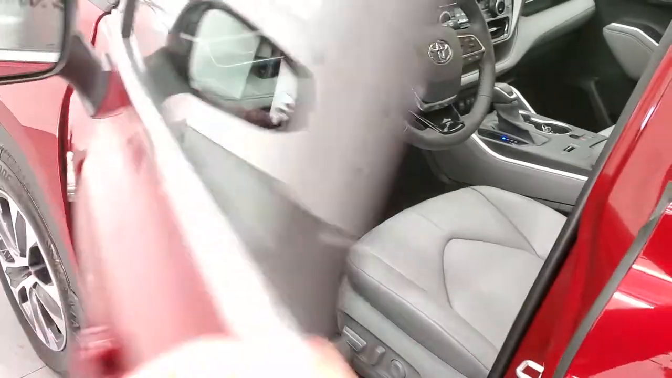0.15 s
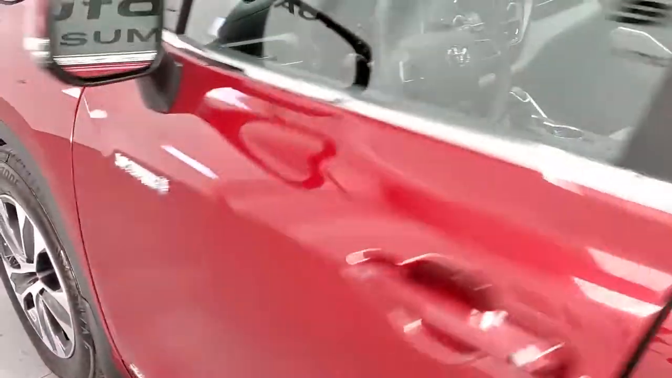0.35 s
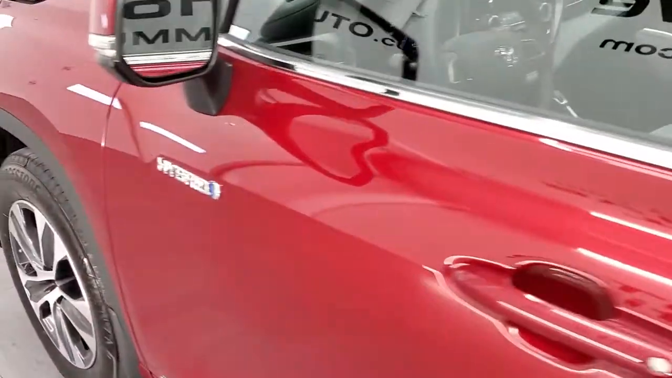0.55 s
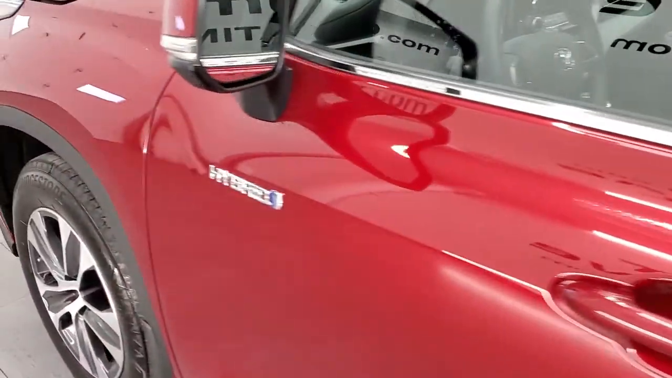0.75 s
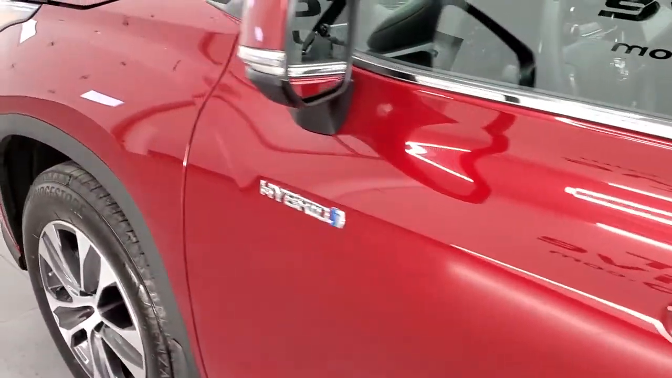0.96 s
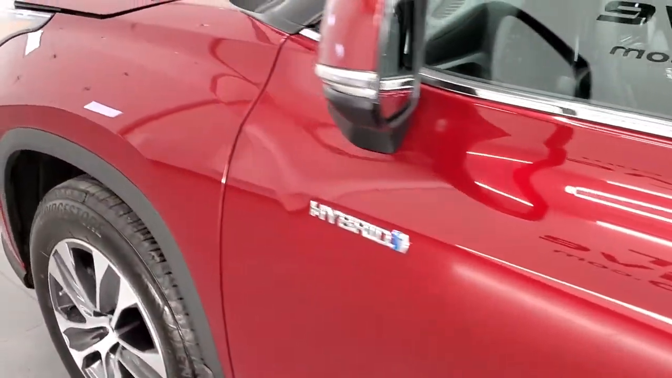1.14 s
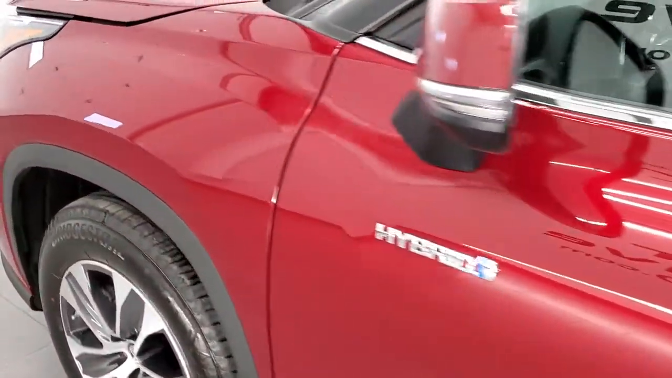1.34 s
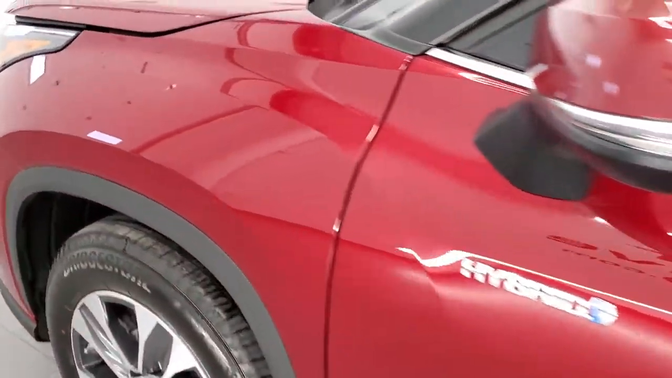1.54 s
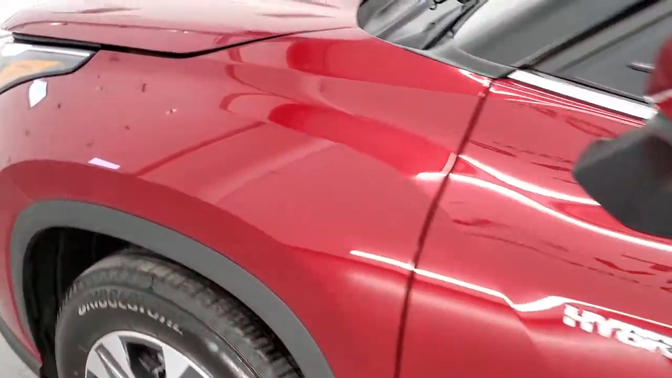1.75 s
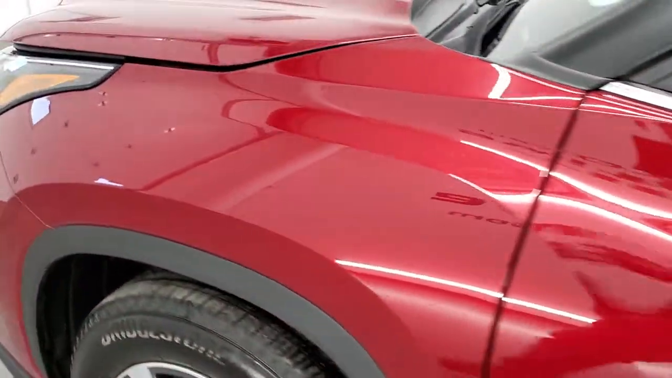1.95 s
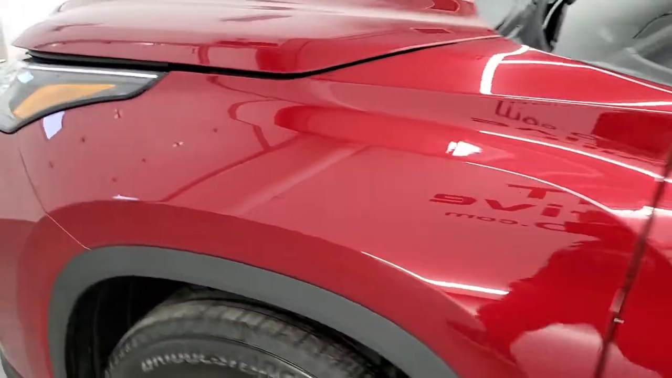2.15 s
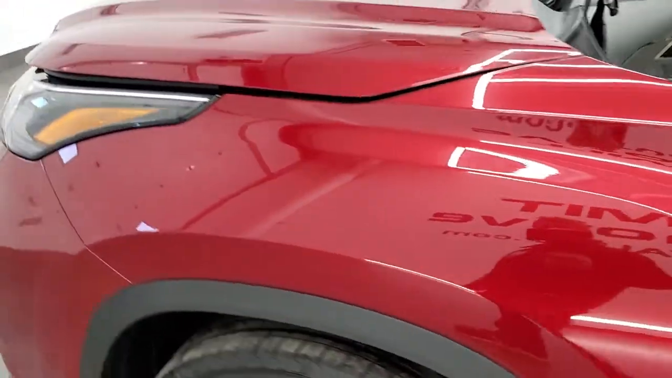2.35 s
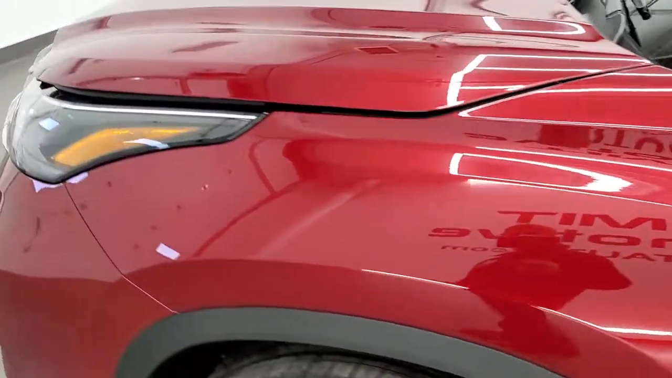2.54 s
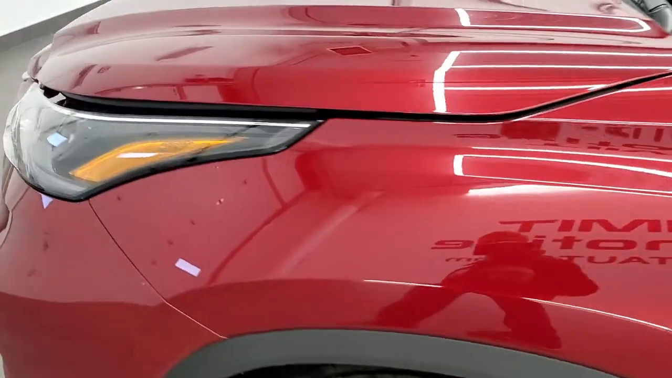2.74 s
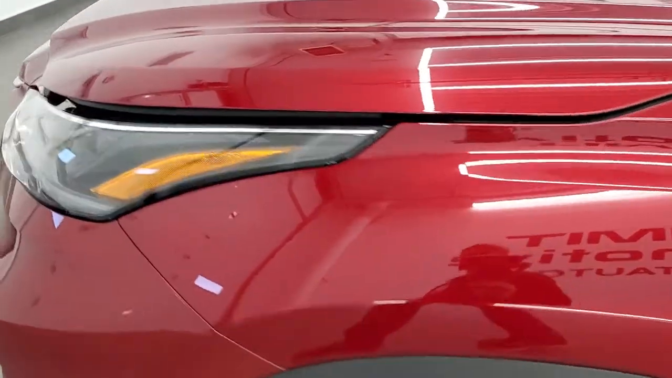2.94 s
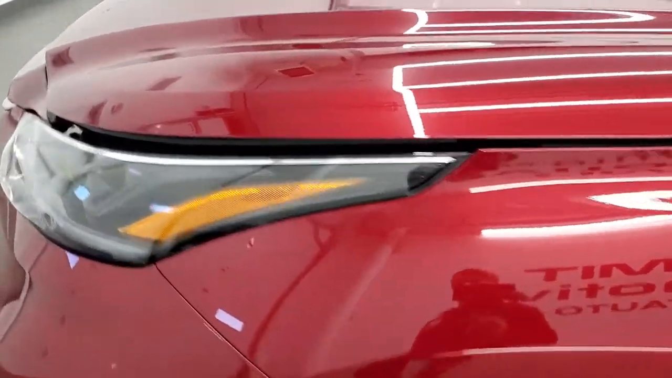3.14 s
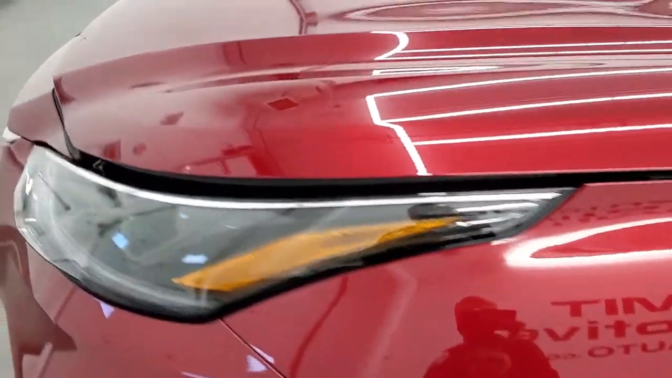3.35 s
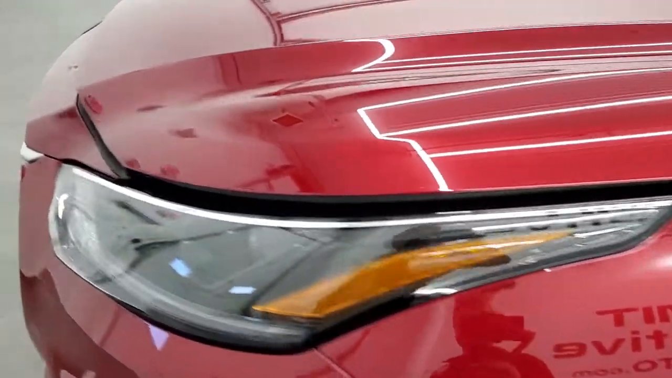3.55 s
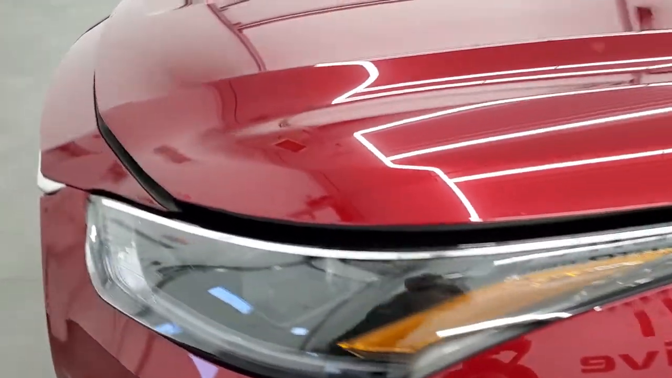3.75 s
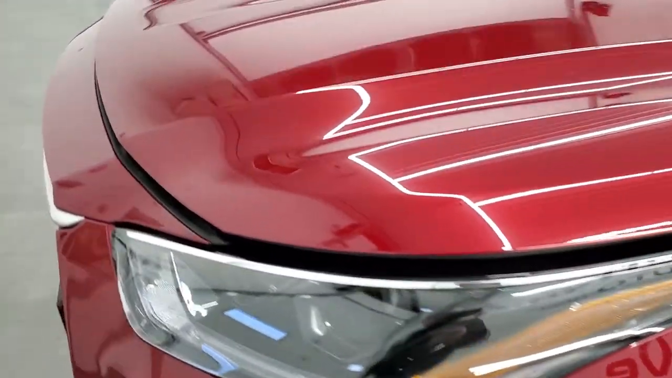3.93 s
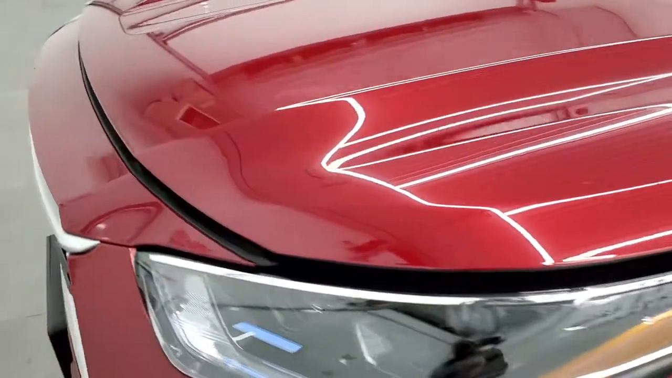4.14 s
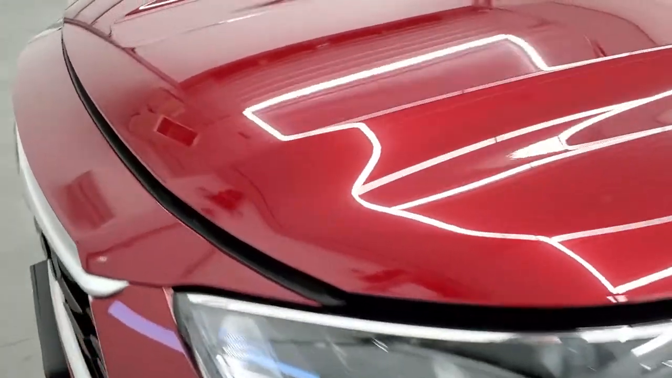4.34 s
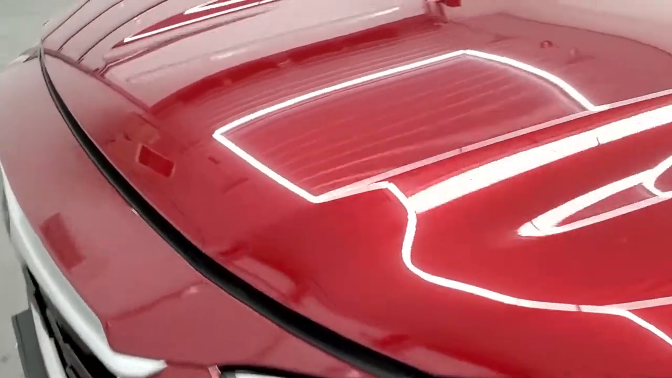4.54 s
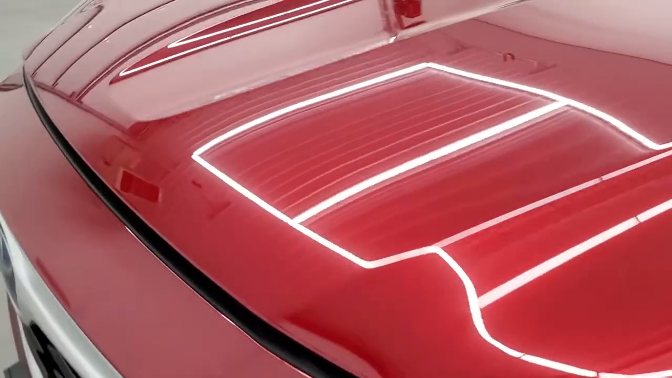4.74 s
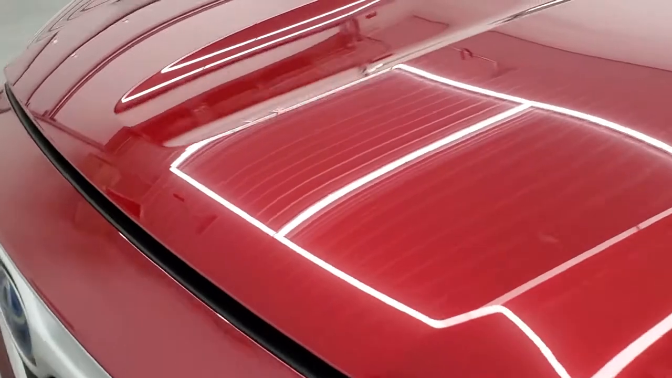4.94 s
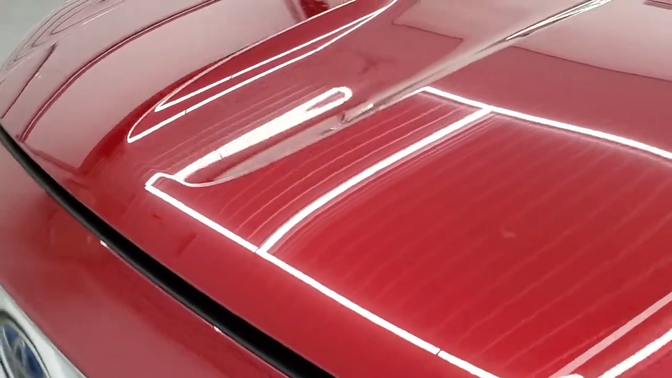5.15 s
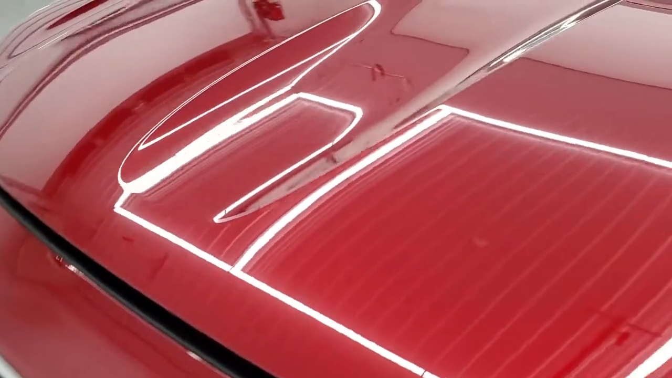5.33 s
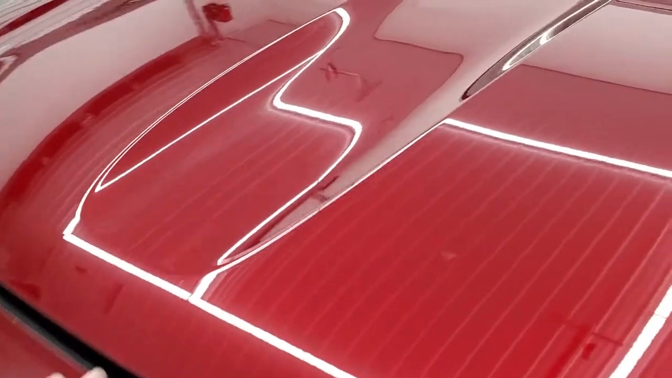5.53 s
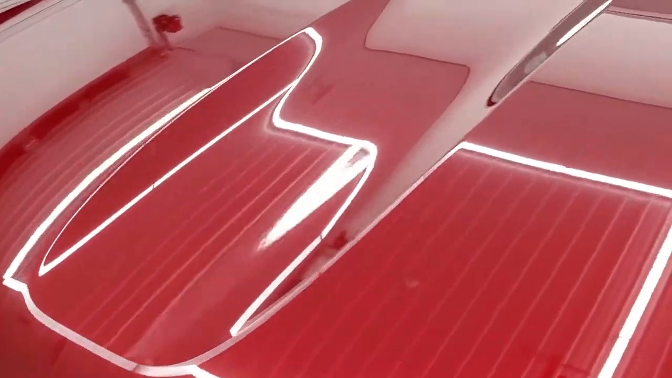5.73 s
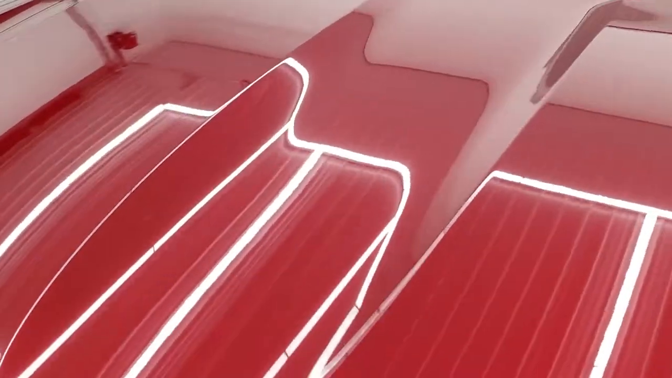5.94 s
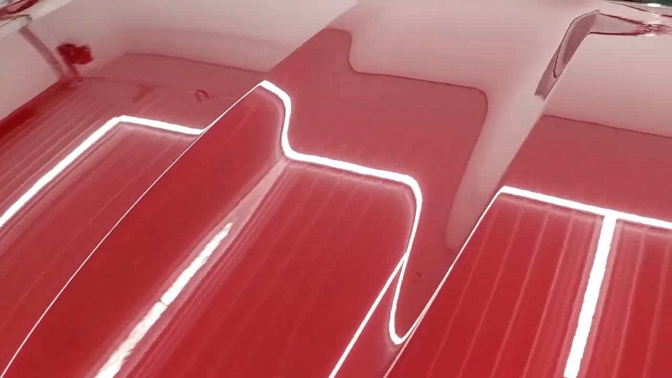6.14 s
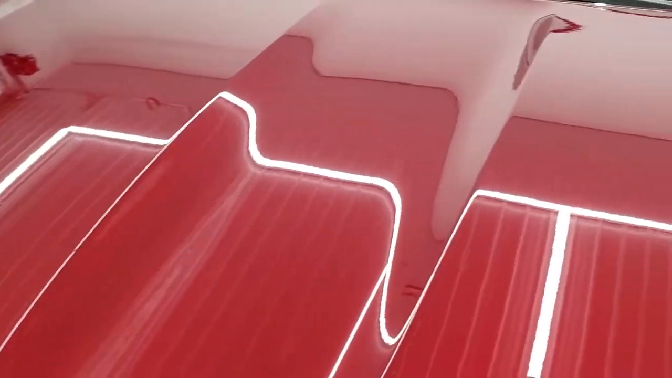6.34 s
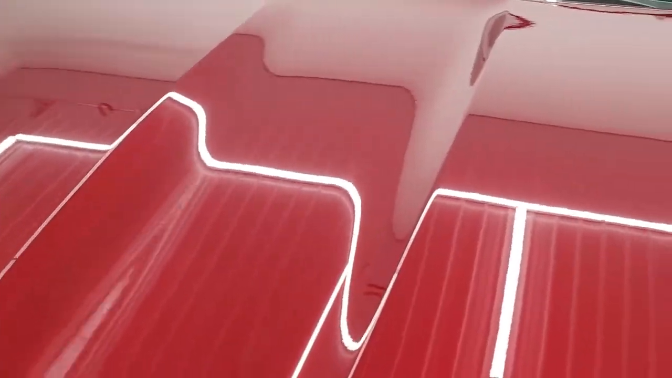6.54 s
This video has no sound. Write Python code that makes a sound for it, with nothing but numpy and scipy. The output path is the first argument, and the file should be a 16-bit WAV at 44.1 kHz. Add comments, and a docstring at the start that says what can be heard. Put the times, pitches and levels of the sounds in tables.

```python
"""Ventilation hums throughout in a large, echoing hall. A palm shoves a car door, which throbs as it
swings and squeezes air past its seal. The seal lands, the latch snaps home, and body and hall boom.
Someone then walks slowly round the car: heels strike, rubber soles drag, creak and chirp by friction,
and clothes rustle with each stride. Last, fingers bump the camera and set its case ringing."""
import sys
import numpy as np
from scipy import signal
from scipy.fft import rfft, irfft, next_fast_len
from scipy.io import wavfile
from scipy.ndimage import map_coordinates

SR = 44100
rng = np.random.default_rng(int(sys.argv[2]) if len(sys.argv) > 2 else 0)


def master_out(mix):
    """Clip the mix to full scale and print it as 16-bit PCM to the path in sys.argv[1]."""
    frames = np.transpose(np.atleast_2d(mix))
    ceiling = np.clip(frames, -1, 1)
    pcm = np.round(ceiling * 32767).astype(np.int16)
    wavfile.write(sys.argv[1], SR, pcm)


N = 290442


def amp(db):
    """Decibels to amplitude ratio."""
    return 10 ** (np.asarray(db) / 20)


def unit(x):
    """Normalise to rms 1."""
    return x / np.sqrt(np.mean(x ** 2) + 1e-20)


def along(points, hz):
    """Interpolate (frequency, value) points on a logarithmic frequency axis."""
    freqs, values = np.transpose(points)
    return np.interp(np.log(hz + 1), np.log(freqs + 1), values)


def clock():
    """The time of every sample in seconds."""
    return np.arange(N) / SR


def curves(rows):
    """Interpolate each column after the time to one value per sample."""
    times, *columns = np.transpose(rows)
    return [np.interp(clock(), times, column) for column in columns]


def wobble(rate):
    """Smooth random modulation with rate knots a second."""
    return map_coordinates(rng.standard_normal(int(N * rate / SR) + 4), [clock() * rate])


def swell(t, rise, fall):
    """A rounded envelope that peaks at t = 0."""
    return np.exp(-(abs(t) / np.where(t < 0, rise, fall)) ** 1.5)


def filtered(x, response):
    """Linear filtering: multiply the spectrum by a frequency response."""
    n = x.shape[-1]
    padded = next_fast_len(n + 8192)
    return irfft(rfft(x, padded) * response(np.fft.rfftfreq(padded, 1 / SR)), padded)[..., :n]


def add(out, s, sound):
    """Superpose a sound on out from time s."""
    part = out[:, max(round(s * SR), 0):][:, :sound.shape[-1]]
    part += sound[..., :part.shape[-1]]


# Likeness of left and right in a diffuse field: (frequency [Hz], correlation [-1 to 1])
CORRELATION = [(60, 0.96), (130, 0.86), (290, 0.9), (640, 0.44), (1400, -0.12), (3000, -0.0099),
               (7000, -0.042)]
def noise(spectrum, size, tilt_db=0):
    """Diffuse field of rms 1, correlated only at long wavelengths; tilt is per octave above 500 Hz."""
    def response(hz):
        colour = amp(along(spectrum, hz) + tilt_db * np.log2(np.maximum(hz, 500)))
        angle = np.arccos(np.clip(along(CORRELATION, hz), -1, 1)) / 2
        return colour * [np.cos(angle), np.sin(angle)]
    mid, side = filtered(rng.standard_normal((2, size)), response)
    return unit(np.array([mid + side, mid - side]))


def burst(spectrum, t60, attack=0.0008):
    """A noise transient with a quick onset and exponential decay."""
    t = clock()[:SR // 2]
    return noise(spectrum, size=len(t)) * amp(-60 * t / t60) * (1 - np.exp(-t / attack))


def ring(modes, contact=0.0014):
    """Free vibration after a blow: a sum of damped modes, neighbours in antiphase."""
    t = clock()[:2 * SR]
    vibration = sum((-1) ** k * amp(db - 60 * t / t60) * np.sin(2 * np.pi * hz * t)
                    for k, (hz, db, t60) in enumerate(modes))
    return vibration * (1 - np.exp(-t / contact))


# Ventilation along the walk: (time [s], hum level [dB], air level [dB])
VENT_LEVELS = [(0, -42.5, -46.5), (1.5, -53, -64), (2.5, -53.5, -62), (3.2, -49.5, -58.5),
               (4.1, -49.5, -57), (4.7, -44.5, -55), (5.6, -46, -55.5), (6.59, -44, -50.5)]
# Tones of the fan and of its motor: (frequency [Hz], relative level [dB])
FAN_TONES = [(84.5, -4), (125, -7.5), (169, -23)]
MOTOR_TONES = [(2487, -73), (6842, -84)]
# Spectra of the ducts and of rushing air: (frequency [Hz], relative level [dB])
DUCT_SPECTRUM = [(20, -7), (30, -9), (46, 6), (60, 2.5), (75, 0), (105, -1), (140, -6.5), (200, -14),
                 (300, -32.5), (600, -68.5)]
AIR_SPECTRUM = [(100, 0.5), (200, 3), (380, 1), (700, -5.5), (1050, -4), (2100, -10.5), (2600, -18),
                (4100, -22), (5300, -23), (7100, -36), (9000, -41), (12000, -78)]
def ventilation(rumble_db=-1.0, shade_db=-9, clear_s=3.9):
    """Tonal fan noise over broadband flow noise; hum and whine grow toward the front of the car."""
    t = clock()
    hum_db, air_db = curves(VENT_LEVELS)
    hum = sum(amp(db + 2.5 * wobble(2.82)) * unit(np.sin(2 * np.pi * hz * t + wobble(4.3)))
              for hz, db in FAN_TONES)
    whine = sum(amp(db + 3 * wobble(5.42)) * unit(np.sin(2 * np.pi * hz * t + .7 * wobble(35)))
                for hz, db in MOTOR_TONES)
    whine *= amp(np.interp(t, [0, clear_s], [shade_db, 0]))
    rumble = amp(rumble_db) * noise(DUCT_SPECTRUM, size=N)
    return amp(hum_db) * (hum + rumble) + amp(air_db) * noise(AIR_SPECTRUM, size=N) + whine


# Fine high hiss drops away after the slam, then slowly grows: (time [s], level [dB])
HISS_LEVELS = [(0, -68), (.5, -69), (.95, -85.5), (2, -76.5), (4.7, -70.5), (6.4, -64), (6.59, -67.5)]
# Fine high hiss, with the microphone's dip at 10 kHz: (frequency [Hz], relative level [dB])
HISS_SPECTRUM = [(2500, -2), (5000, 7), (7800, 11.5), (9000, -4), (10200, 0), (12000, 5), (15500, 1.5)]
def hiss_and_rustle(stride_db=-73.5, stride_lag_s=0.083, arm_db=-65, arm_s=.21, crinkle_db=-7):
    """Amplitude modulation: a fine, crinkling hiss swells as the sleeve moves and trouser legs brush."""
    t = clock()
    strides = sum(swell(t - s - stride_lag_s, rise=0.15, fall=0.21) for s, _, _ in FOOTFALLS)
    arm = swell(t - arm_s, rise=0.1, fall=0.059)
    envelope = amp(curves(HISS_LEVELS)[0]) + amp(stride_db) * strides + amp(arm_db) * arm
    flicker = amp(6 * np.clip(wobble(160), -3, 3))
    crinkles = unit(flicker * noise([(5000, -32), (10000, -7), (12500, 0), (15500, 0)], size=N))
    flutter = amp(wobble(13))
    return envelope * flutter * (noise(HISS_SPECTRUM, size=N) + amp(crinkle_db) * crinkles)


# Throb of the moving door: (time [s], level [dB])
THROB_LEVELS = [(0, -24), (.04, -30.5), (.13, -27.5), (.22, -33.5), (.28, -33.5), (.35, -36), (.39, -58)]
# Modes of the damped door skin: (frequency [Hz], relative level [dB], t60 [s])
SKIN_MODES = [(54, -2.5, 0.14), (150, -7, 0.048), (292, -0.5, 0.046), (404, -2.5, 0.023), (636, -8, 0.025),
              (730, -23, 0.033), (997, -9, .035), (1213, -16, 0.039)]
def door_swing(throb_hz=45, shove_s=.032, shove_db=-17, soft_hz=450, squeeze_db=-30, squeeze_s=0.015):
    """A soft impact excites mainly low modes; the door then throbs and displaces air past its seal."""
    t = clock()
    throb = amp(curves(THROB_LEVELS)[0]) * unit(np.sin(2 * np.pi * throb_hz * t + .5 * wobble(49)))
    seal_s = DOOR_CONTACTS[0][0]
    squeeze = amp(squeeze_db) * np.exp(-abs(t - seal_s) / squeeze_s)
    air = noise([(100, -9), (500, 6.0), (1100, -5), (2200, -13), (5000, -33), (12000, -36)], size=N)
    out = throb + squeeze * air
    palm = filtered(ring(SKIN_MODES, contact=0.0035), lambda hz: 1 / (1 + (hz / soft_hz) ** 2))
    add(out, shove_s, amp(shove_db) * palm)
    return out


# Small clicks: (time [s], level [dB])
CLICKS = [(0.142, -42.5), (.185, -46), (.198, -38), (.211, -41), (.291, -53), (2.2365, -53), (4.861, -49.5),
          (5.155, -48), (6.19, -49), (6.335, -52), (6.474, -55)]
# Spectrum of a click: (frequency [Hz], relative level [dB])
CLICK_SPECTRUM = [(2000, -28), (4500, -2), (6500, 5), (8000, 1.5), (10000, -13), (12500, 5.5), (15500, 0)]
def clicks():
    """Direct sound: brief, bright transients close by, heard without reverberation."""
    out = np.zeros((2, N))
    for s, db in CLICKS:
        add(out, s, amp(db) * burst(CLICK_SPECTRUM, t60=0.021))
    return out


# Chirps: first the door check's detent as the door swings, then rubber soles on the floor: (time [s], level
# [dB], centre frequency [Hz])
CHIRPS = [(0.148, -45, 1070), (2.858, -50, 1210), (4.242, -53, 1270), (4.963, -43, 2130),
          (5.032, -46, 1860), (5.504, -51, 1440), (5.529, -51.5, 1140)]
def squeaks(half_length_s=0.016, log_width=0.48):
    """Friction chirps: hoarse narrow-band noise under a Gaussian envelope, first from the door check's detent,
    then from turning soles."""
    out, t = np.zeros((2, N)), clock()[:SR // 5] - .1
    for s, db, hz in CHIRPS:
        band = [(hz * np.exp(-log_width), -25), (hz, 0), (hz * np.exp(log_width), -25), (4 * hz, -60)]
        add(out, s + t[0], amp(db) * np.exp(-(t / half_length_s) ** 2) * noise(band, size=t.size))
    return out


# Seal, latch and striker meet: (time [s], skin gain [dB], crack level [dB], crack t60 [s])
DOOR_CONTACTS = [(0.3717, -25, -21.5, 0.072), (0.3768, -12, -14.5, 0.017), (0.3813, -2, -10.5, 0.024),
                 (0.3859, -20, -12.5, 0.022), (.4035, -27, -38, 0.043), (.412, -20, -24, 0.045)]
# Stereo balance of the struck skin: (frequency [Hz], left minus right [dB])
SKIN_BALANCE = [(60, 2.5), (250, 4.5), (400, 7.5), (680, -8), (1100, 5)]
# Spectra of latch crack, trim shudder and hall boom: (frequency [Hz], relative level [dB])
LATCH_SPECTRUM = [(60, -15), (250, -3), (600, 4), (1100, 2.5), (1600, -4.5), (2300, -8), (3500, -19),
                  (5500, -16), (8000, -23), (10000, -38), (15000, -28)]
TRIM_SPECTRUM = [(40, -1), (130, 13.5), (300, 7.5), (600, -4.5), (1200, -5), (2200, -10.5), (4400, -22),
                 (7600, -23), (10000, -36), (15000, -34)]
BOOM_SPECTRUM = [(25, -4), (60, -1), (130, 4.5), (200, -3), (270, 1), (400, -5.5), (520, -11), (680, -11.5),
                 (1170, -23.5), (1550, -19.5), (1950, -20.5), (4400, -35), (6000, -39.5), (7800, -36),
                 (9500, -44.5)]
# Modes of the car's body and cabin air: (frequency [Hz], level [dB], t60 [s])
BODY_MODES = [(28, -23, 1.05), (57.5, -18, 1.4), (67, -16.5, 0.56), (100.6, -18, 0.84), (134.9, -24, 0.6),
              (155.2, -22, 0.83), (242, -26, 0.47), (279, -39, 1.94), (352, -38, 1.5)]
def door_slam(seat_s=.38, shudder_db=-20, boom_db=-25, snap_s=.3862, snap_db=-19):
    """Impact excitation: contacts thump the skin and crack the latch; trim, body and hall ring on."""
    out = np.zeros((2, N))
    skin = filtered(ring(SKIN_MODES), lambda hz: amp(np.outer([.5, -.5], along(SKIN_BALANCE, hz))))
    for s, skin_db, crack_db, t60 in DOOR_CONTACTS:
        add(out, s, amp(skin_db) * skin)
        add(out, s, amp(crack_db) * burst(LATCH_SPECTRUM, t60, attack=0.00074) * amp([[-.8], [.8]]))
    pawl_spectrum = [(1000, -19), (3000, -3), (5000, -9), (8000, 2), (10000, -6), (15000, -5)]
    snap = burst(pawl_spectrum, t60=0.0081, attack=0.0004)  # the steel pawl drops in
    add(out, snap_s, amp(snap_db) * snap * amp([[-1.1], [1.1]]))
    add(out, seat_s, amp(shudder_db) * burst(TRIM_SPECTRUM, t60=0.37, attack=0.0027))
    body = from_right(ring(BODY_MODES), lag=0.00034)
    add(out, seat_s + 0.01818, body)  # the shell answers a moment after the door
    add(out, seat_s, amp(boom_db) * hall_tail(BOOM_SPECTRUM, build=0.0057))
    return out


def from_right(x, lag):
    """Path difference: a sound from the right reaches the left channel lag seconds later."""
    return filtered(x, lambda hz: np.exp(1j * np.pi * lag * np.outer([-1, 1], hz)))


# Reverberation time of the hall: (frequency [Hz], t60 [s])
HALL_T60 = [(50, 4.25), (130, 0.49), (290, 2.26), (600, 3.93), (1200, 5.03), (2300, 4.97), (4400, 5.04),
            (5500, 3.1), (7800, 1.57), (10000, 0.88), (15000, 0.34)]
def hall_tail(spectrum, build):
    """Reverberation: a diffuse field builds up, then each frequency decays at its own rate."""
    hz, t, bands = signal.stft(noise(spectrum, size=3 * SR), SR, nperseg=512)
    decay = amp(-60 * t / along(HALL_T60, hz)[:, None])
    _, tail = signal.istft(bands * decay, SR, nperseg=512)
    return tail * (1 - np.exp(-clock()[:tail.shape[1]] / build))


# Slow footfalls: (time [s], heel level [dB], sole level [dB])
FOOTFALLS = [(1.39, -67, -64), (2.169, -62, -54), (2.848, -54, -53), (3.483, -40.5, -57),
             (4.201, -49, -53.5), (4.825, -37, -50.5), (5.5, -58, -55)]
# Soles drag over the floor: (time [s], level [dB], fall time [s], tilt [dB/octave])
SOLE_DRAGS = [(1.969, -62, 0.3, -1), (2.237, -51, 0.035, 2), (2.309, -50, 0.041, -0.5),
              (3.034, -59, 0.068, 2.5), (3.228, -60, 0.14, -5.5), (3.595, -47.5, 0.081, -.7),
              (4.364, -52, 0.044, -1), (4.971, -46, 0.086, 1.8)]
# Spectrum of a heel strike: (frequency [Hz], relative level [dB])
HEEL_SPECTRUM = [(40, -30), (150, -32), (300, 4), (600, 7.5), (1000, -3.5), (2000, -9), (5000, -57),
                 (9000, -60)]
def footsteps(roll_s=.01, grit_db=3):
    """Impact and friction: the heel lands and the sole rolls down after it; some soles drag."""
    out = np.zeros((2, N))
    for s, _, sole_db in FOOTFALLS:
        rub(out, s + roll_s, sole_db, rise=0.033, fall=0.027, tilt_db=-5.0)
    for s, db, fall, tilt_db in SOLE_DRAGS:
        rub(out, s, db, 0.61 * fall, fall, tilt_db)
    out *= amp(grit_db * wobble(110))  # the rubber grips and lets go
    for s, heel_db, _ in FOOTFALLS:
        add(out, s, amp(heel_db) * burst(HEEL_SPECTRUM, t60=0.042, attack=0.00029))
    return out


# Spectrum of a sliding sole or finger: (frequency [Hz], relative level [dB])
FRICTION_SPECTRUM = [(80, -28), (200, -9), (350, -12), (620, -0.5), (800, -2.5), (1100, 0), (2000, 5),
                     (3400, -5.5), (4800, -11.5), (7800, -18), (10000, -32.5), (13000, -26), (16000, -40)]
def rub(out, s, db, rise, fall, tilt_db):
    """Sliding friction: add one stroke of noise that peaks at time s."""
    stroke = amp(db) * swell(clock()[:SR] - .5, rise, fall)
    add(out, s - .5, stroke * noise(FRICTION_SPECTRUM, size=SR, tilt_db=tilt_db))


def in_hall(direct, wet_db=2, early_db=6, early_s=0.16):
    """Convolution with an impulse response: floor and car reflect first, then the hall."""
    spectrum = [(150, -10.5), (600, -3.5), (2200, -4.5), (3500, 1), (5500, -3.5), (12000, 3.5)]
    tail = hall_tail(spectrum, build=0.016)
    tail *= 1 + amp(early_db) * np.exp(-clock()[:tail.shape[1]] / early_s)
    echo = signal.fftconvolve(direct, tail / np.linalg.norm(tail[0]), axes=1)[:, :N]
    return direct + amp(wet_db) * echo


# Spectrum of one slip of the rubber: (frequency [Hz], relative level [dB])
SLIP_SPECTRUM = [(150, -23), (600, -3), (1300, 3), (2100, -4), (3200, -27), (8000, -47)]
def pivot(at_s=3.2, gain_db=-44, slip_hz=62, count=24, jitter=.25, spread_db=3, decay_s=0.0022):
    """Stick-slip friction: a sole twists in a short, uneven creak at the car's corner."""
    out, t = np.zeros((2, N)), clock()[:SR // 2] - .25
    lateness, strength = rng.standard_normal((2, count, 1))
    slip_times = (np.arange(count)[:, None] - count / 2 + jitter * lateness) / slip_hz
    jerks = (t > slip_times) * np.exp(-abs(t - slip_times) / decay_s) * amp(spread_db * strength)
    envelope = amp(gain_db) * swell(t, rise=0.089, fall=0.072) * jerks.sum(0)
    add(out, at_s + t[0], envelope * noise(SLIP_SPECTRUM, size=t.size))
    return out


# Fingers bump the camera: (time [s], bump gain [dB], nail level [dB])
FINGER_BUMPS = [(5.9783, -28.5, -32), (6.202, -34.5, -62), (6.215, -36.5, -67), (6.257, -34.5, -42.5),
                (6.282, -37.5, -62), (6.357, -44, -49), (6.4723, -29, -37.5), (6.501, -30.5, -52)]
# Modes of the camera's case: (frequency [Hz], relative level [dB], t60 [s])
CASE_MODES = [(241, -10.5, 0.072), (362.4, -4.5, 0.083), (452, -1, 0.02), (1026, -19, 0.043)]
# Spectra of a soft fingertip and of a nail: (frequency [Hz], relative level [dB])
FINGERTIP_SPECTRUM = [(40, -30), (150, 2), (270, -2.5), (450, 2.5), (560, -10), (900, -36), (2000, -41.5),
                      (5000, -70)]
NAIL_SPECTRUM = [(100, -42), (400, 1), (700, 2), (1100, -2.5), (1600, -6), (2200, -7.5), (4000, -14.5),
                 (7000, -18.5), (10000, -29)]
# Fingers shift their grip: (time [s], level [dB])
FINGER_SLIDES = [(5.975, -51.5), (6.189, -55.5), (6.301, -60.5)]
def handling(fingertip_db=-13):
    """Structure-borne sound: bumps excite the modes of the camera's case, and fingers slide over it."""
    out, case = np.zeros((2, N)), ring(CASE_MODES, contact=0.0015)
    for s, db, nail_db in FINGER_BUMPS:
        add(out, s, amp(db) * case)
        add(out, s, amp(db + fingertip_db) * burst(FINGERTIP_SPECTRUM, t60=0.31))
        add(out, s, amp(nail_db) * burst(NAIL_SPECTRUM, t60=0.041))
    for s, db in FINGER_SLIDES:
        rub(out, s, db, rise=0.041, fall=0.15, tilt_db=8)
    return out


def scene():
    """Superposition: the pressures of the hall's air, the door and the walker add."""
    return (ventilation() + hiss_and_rustle() + door_swing() + clicks() + squeaks() + door_slam()
            + in_hall(footsteps() + pivot()) + handling())


def record(dry, top_hz=15760):
    """Saturation and band limiting: the camera rounds off peaks at full scale and cuts the top treble."""
    rounded = dry / (1 + dry ** 8) ** (1 / 8)
    return filtered(rounded, lambda hz: np.clip((top_hz - hz) / 200 + .5, 0, 1))


dry = scene()
out = record(dry)
master_out(out)
```